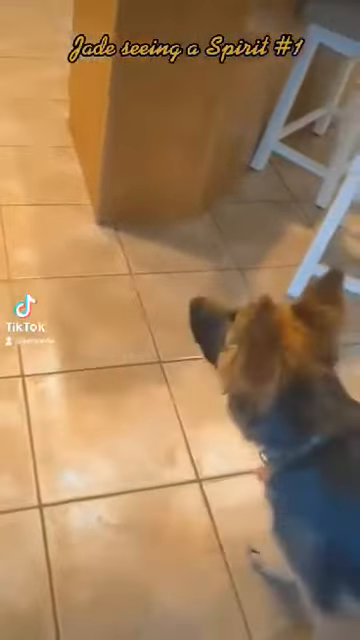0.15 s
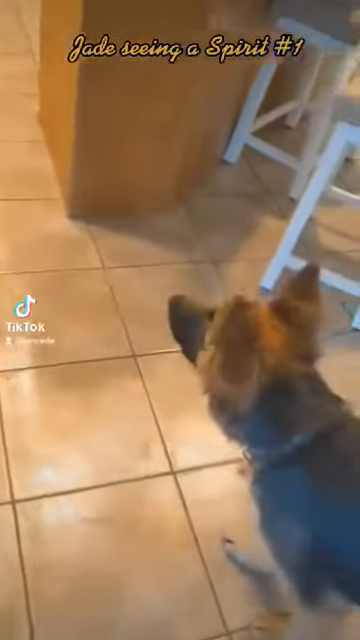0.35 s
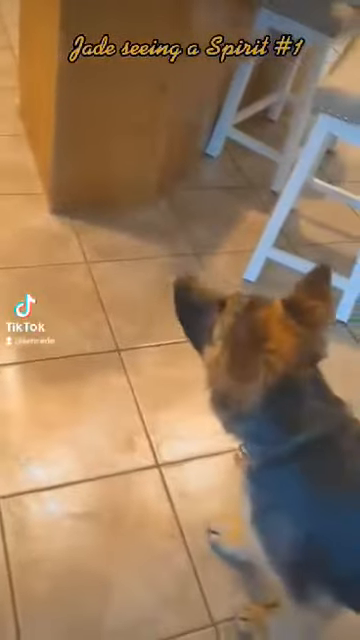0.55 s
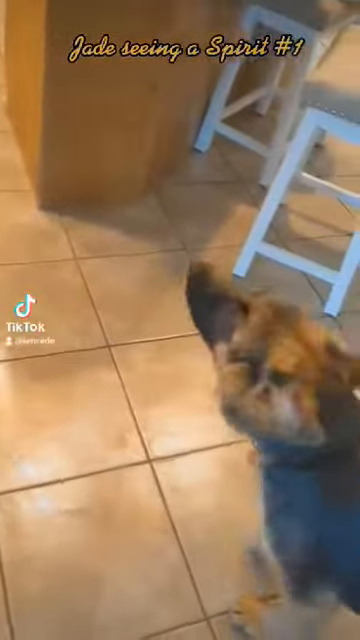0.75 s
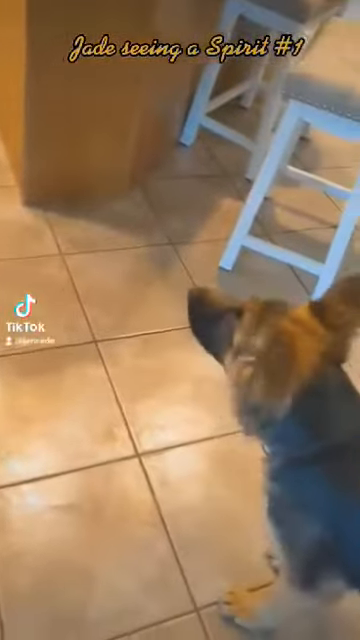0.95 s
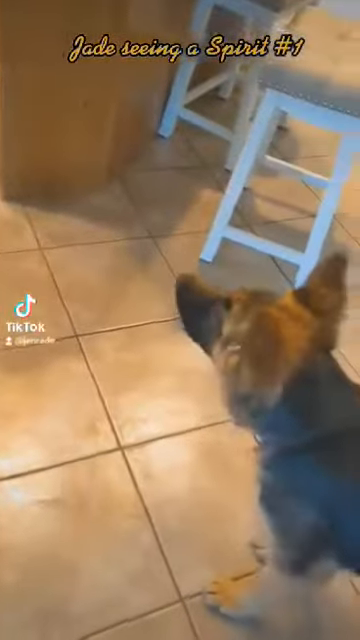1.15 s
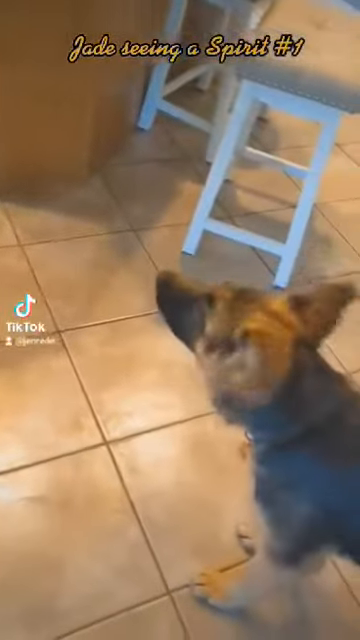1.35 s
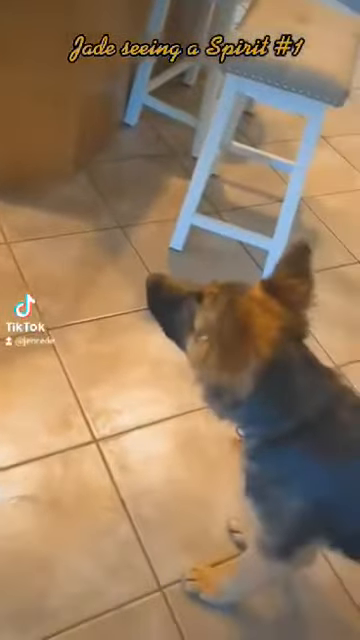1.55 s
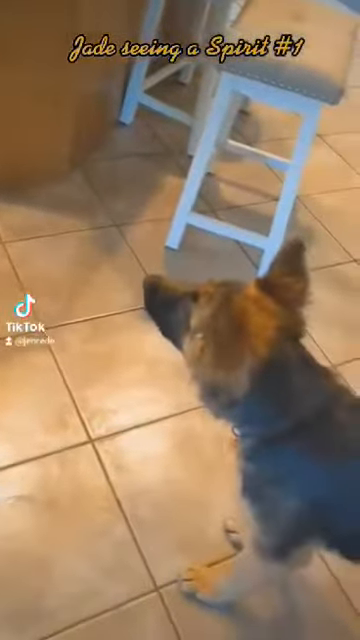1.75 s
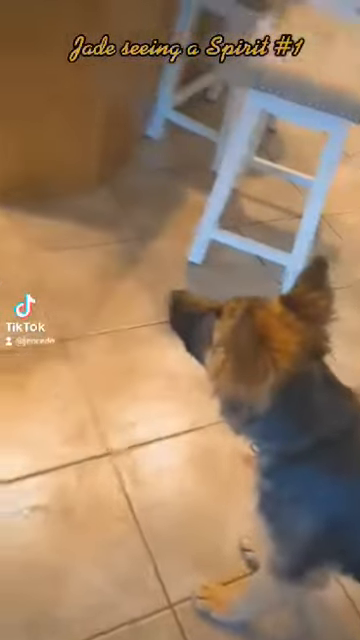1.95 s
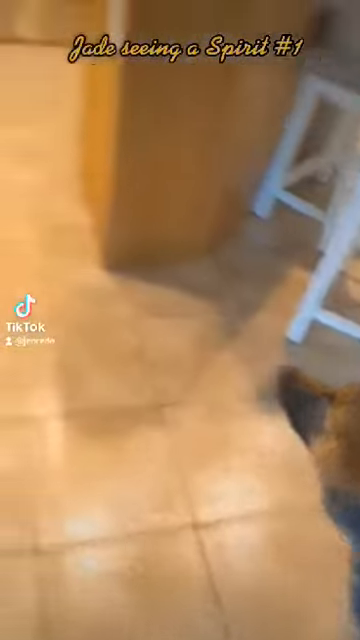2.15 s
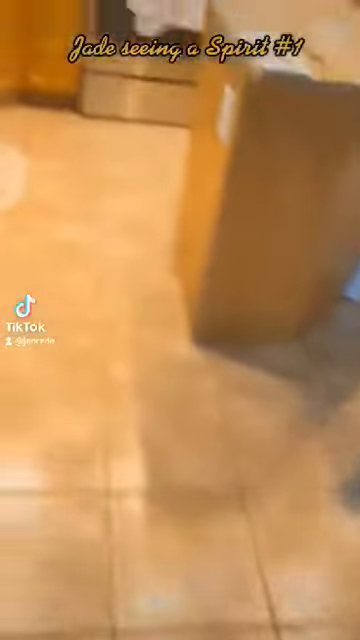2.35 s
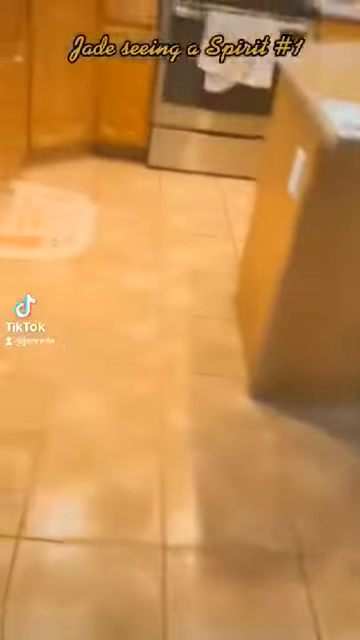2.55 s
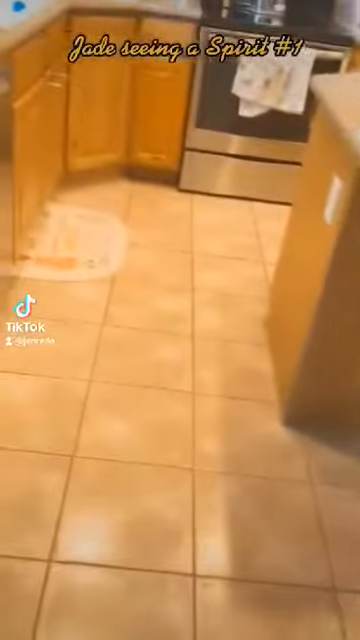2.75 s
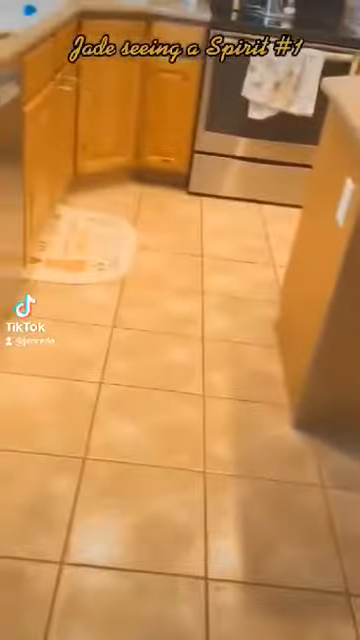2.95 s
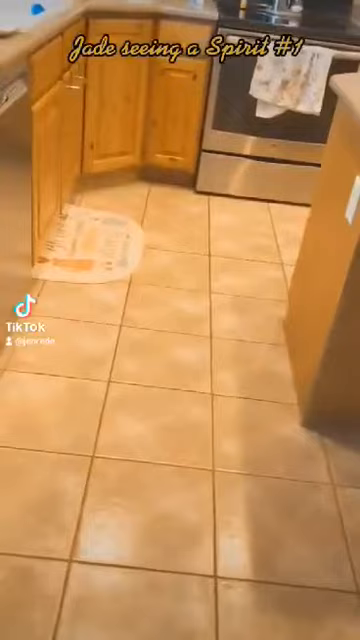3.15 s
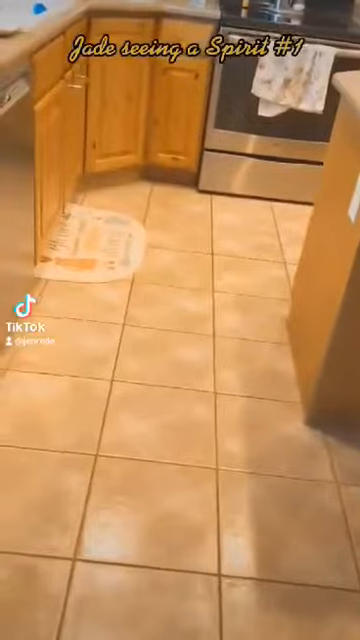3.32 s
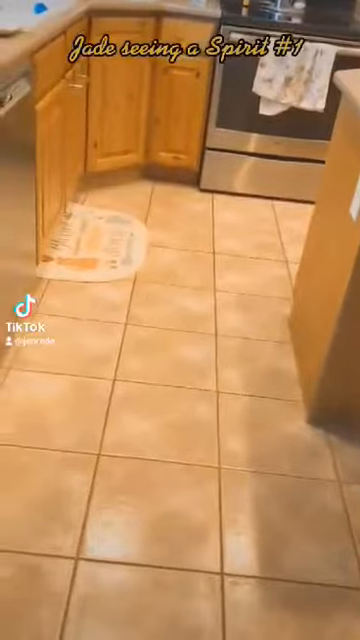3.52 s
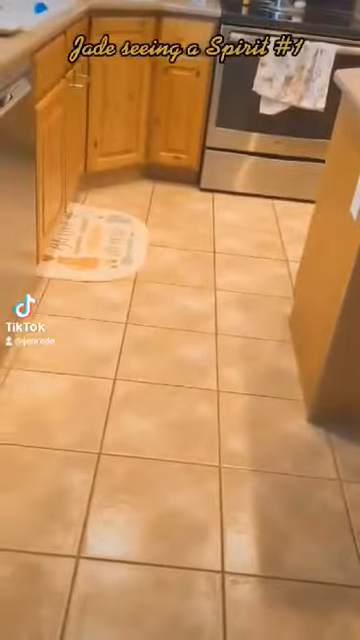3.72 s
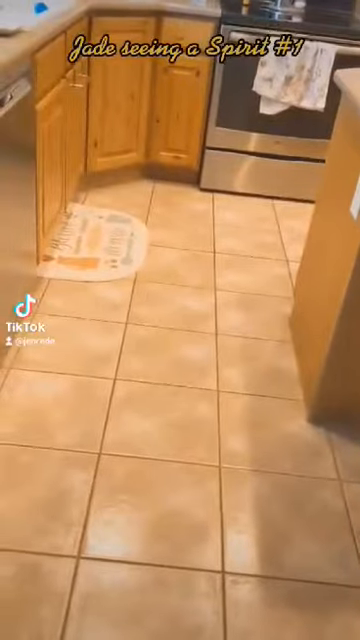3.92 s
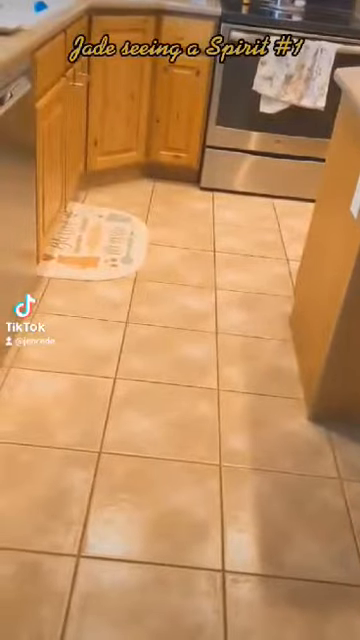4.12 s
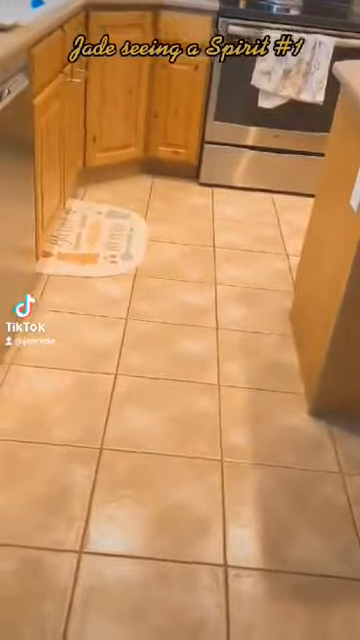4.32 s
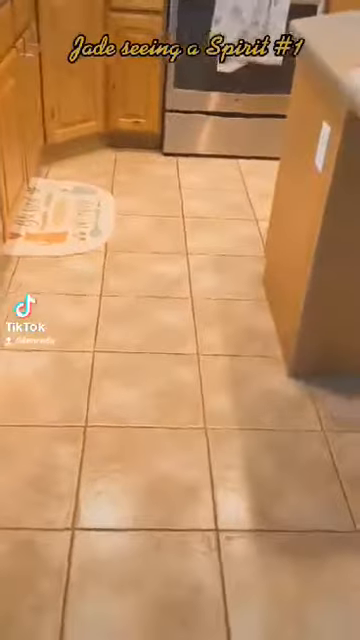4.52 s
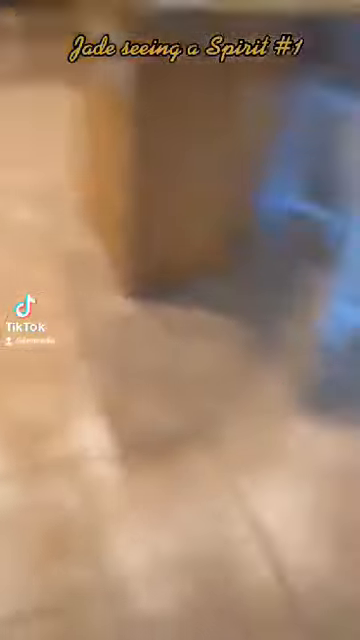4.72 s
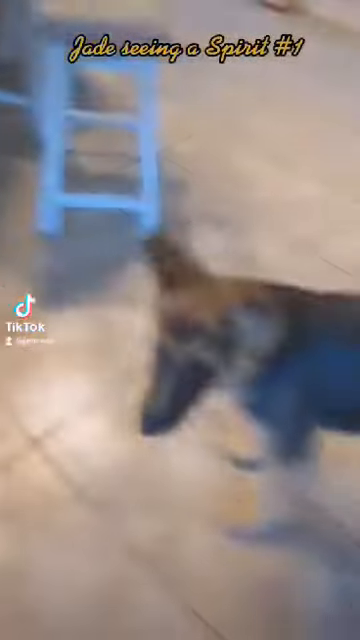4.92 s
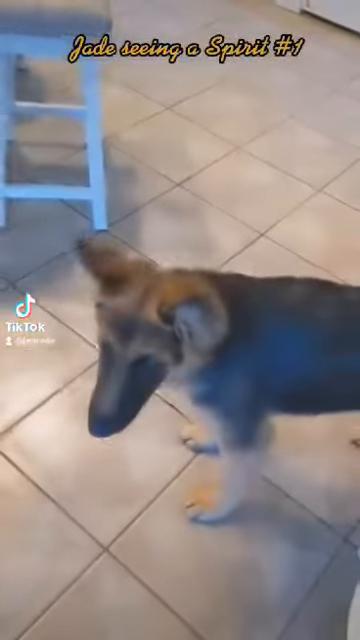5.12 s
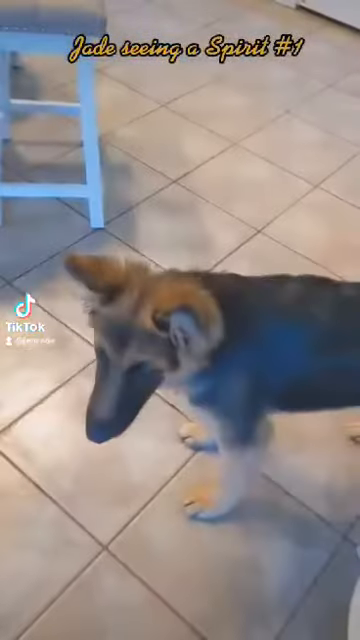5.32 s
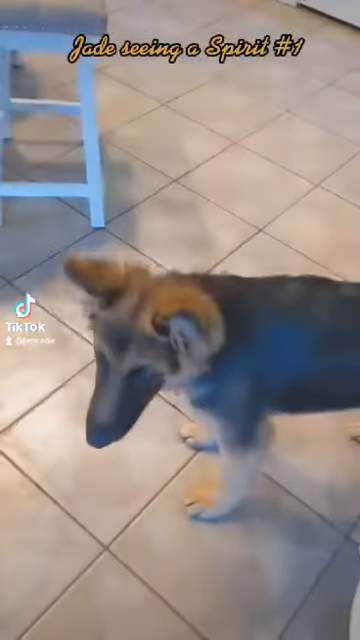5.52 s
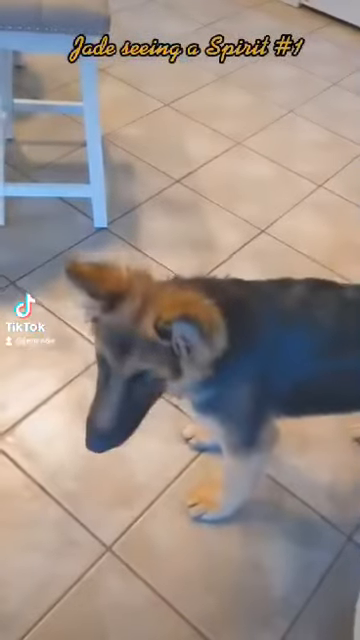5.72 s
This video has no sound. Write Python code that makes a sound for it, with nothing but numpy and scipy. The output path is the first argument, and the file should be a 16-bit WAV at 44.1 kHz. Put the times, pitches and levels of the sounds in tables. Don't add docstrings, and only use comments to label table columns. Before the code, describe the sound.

In a hard-surfaced, tiled kitchen, a young dog barks hoarsely a step or two from a handheld phone. The first bark is already sounding at 0 seconds and dies into a short ringing echo. Faint claw ticks follow at about 0.3 and 0.5, with soft pad thuds near 0.5 and 0.7 and light nose breath. Sharp barks snap upward at 0.8 and 1.3, the second bracketed by low grumbles. After a pause, a brief huff leads to barks at 2.4 and 2.7. A longer, quiet closed-mouth grumble runs from about 2.9 into a strong, short bark at 3.5. Faint claws tick around 3.9 and 4.1. A small huff and grumble precede the last, quieter, raspier bark at 4.6, leaning left. Its echo fades, leaving subdued house hum and low hand rumble, which swells slightly right at the end, near 5.9.

```python
import sys
import numpy as np
from scipy import signal
from scipy.fft import rfft, irfft
from scipy.io import wavfile
from scipy.ndimage import uniform_filter1d, map_coordinates

SR = 44100
rng = np.random.default_rng(int(sys.argv[2]) if len(sys.argv) > 2 else 0)


def put_to_file(sound):
    columns = np.atleast_2d(sound).T
    safe = np.clip(columns, -1, 1)
    whole_steps = np.round(safe * 32767)
    wavfile.write(sys.argv[1], SR, whole_steps.astype(np.int16))


def makeup_ratio(level_db):
    decades = np.asarray(level_db, float) / 20
    return 10 ** decades


N = 258867

# voice breaks open in seconds, top fold rate in Hz, peak effort in dB, rise in seconds,
# hold in seconds.
BARKS = [(-.105, 490.4, -9.5, 0.054, .14), (0.765, 496.9, -6, .062, .08), (1.273, 457.6, -4.5, .05, 0.038),
         (2.41, 497, -10, 0.064, .085), (2.732, 471.2, -5, .06, 0.037), (3.509, 460.2, -3, .05, .012),
         (4.639, 492.4, -12.5, .028, .026)]
# fold rate at the break as a share of the top rate, bend of the rise (exponent),
# effort at the break in dB, effort peak as a share of the rise, effort after the rise in dB.
BARK_MANNERS = [(.62, 1.9, -10.5, 0.44, -5), (0.661, 1.6, -12, .5, -9), (.62, 2.8, -18, .6, -6.5),
                (0.648, 1.3, -10, .6, -5.5), (.66, 3, -11, 0.43, -7), (.66, 4, -17.5, .45, -1.9),
                (0.781, 1.8, -13.5, 0.81, -3.5)]
# frequency at widest gape in Hz, gain at the break in dB,
# gain at mid rise in dB, gain in the hold in dB.
BARK_MOUTHS = [(1000, 4.5, -1, 3), (1140, 8, 4.5, 11.5), (1145, 9, -3.5, 4), (1120, 7, 7, 8.5),
               (1398, 5, -5.5, 5.5), (1000, 7, -13.5, 0.5), (840, 4.5, 7, 14)]
# time in seconds, fold rate in Hz, effort in dB,
# jaw opening 0-1.
GRUMBLES = [
    [(.91, 147, -53, .3), (1.04, 77, -44, .3), (1.12, 83, -48, .4), (1.19, 101, -34.5, .45),
     (1.245, 107.7, -38, 0.6), (1.275, 220, -33, .5)],
    [(1.39, 250, -49.5, .6), (1.44, 149, -24.5, 0.9), (1.49, 125, -39, 0.76), (1.56, 120.6, -45.5, 0.4)],
    [(2.56, 165, -50.5, 0.4), (2.59, 148, -30.5, .3), (2.63, 135.7, -28, .1), (2.69, 121, -40, 0.3),
     (2.73, 215.5, -28, .4)],
    [(2.86, 245.6, -45.5, .3), (2.91, 149, -25, 0.9), (2.95, 119.5, -39.5, .4), (3.004, 105.7, -35.5, .05),
     (3.21, 101.1, -30.5, 0.06), (3.3, 104.5, -35, 0.2), (3.436, 104.5, -31.5, 0),
     (3.48, 101.6, -39.5, .17), (3.51, 230, -29.5, .4)],
    [(4.54, 90, -69, .4), (4.575, 106, -43, .6), (4.605, 168, -37, .6), (4.635, 290, -29.5, .6)],
]
# frequency in Hz, gain in dB.
GRUMBLE_MOUTHS = [(310, 2.5), (800, -3.5), (810, -11.5), (820, 1), (450, 12)]
# frequency in Hz, gain in dB.
THROAT_SHUT = [(60, -15.5), (103, -15), (206, 4), (310, -10.5), (420, -40), (800, -32.5), (1500, -55),
               (3000, -55), (13000, -94.5)]
# frequency in Hz, gain in dB.
THROAT_WIDE = [(100, -19), (250, -1.5), (470, -1), (1000, -7.5), (1900, -11), (2300, -38), (3600, -47.5),
               (4200, -56.5), (6000, -51.5), (8500, -52), (13500, -70)]
# time in seconds, brightness in dB, rasp in dB, sizzle in dB.
VOICE_COLOUR = [(0, -5.5, -15.5, -36.5), (.8, -4.5, -17.5, -39.5), (1.3, -8, -15.5, -37),
                (2.45, -2.5, -11.5, -32.5), (2.77, -7.5, -25, -37.5), (3.2, -4, -31, -39.5),
                (3.54, -8.5, -17, -40.5), (4.67, -0.5, -6, -28)]
# frequency in Hz, density in dB per Hz.
RASP_SPECTRUM = [(200, -29.5), (600, -13), (1000, -4.5), (1900, -6.5), (2400, -22), (3500, -21.5),
                 (4200, -49.5), (14000, -74)]
# frequency in Hz, density in dB per Hz.
SIZZLE_SPECTRUM = [(3000, -43), (4600, -11), (5400, -5), (6500, 2.5), (8300, -5.5), (9300, -16),
                   (12300, -15.5), (13500, -28.5)]
# start in seconds, end in seconds, level in dB, swell as a share of the length 0-1.
HUFFS = [(.667, 0.93, -52.5, 0), (2.27, 2.41, -42, 0.9), (4.6, 4.66, -42, 1), (.537, .59, -52, .05),
         (0.12, 0.53, -64.5, 0.2), (3.19, 3.23, -62.5, 1), (3.92, 3.95, -68, .1)]
# frequency in Hz, density in dB per Hz.
HUFF_SPECTRUM = [(88, -35), (150, -6.5), (836, -10.5), (1490, -13.5), (2290, -9.5), (9290, -15.5),
                 (12100, -21), (13000, -39)]
# time in seconds, peak in dB, ring in Hz.
CLAWS = [(0.284, -40.5, 7240), (0.5392, -37.5, 2100), (1.0587, -45.5, 2000), (1.2176, -54, 2596),
         (3.1936, -44.5, 2180), (3.9245, -50.5, 2340), (4.0741, -58.5, 6180)]
# time in seconds, peak in dB, ring in Hz, t60 in seconds.
PAWS = [(.485, -37, 182.4, 0.2817), (0.674, -45, 262.2, 0.14)]
# time in seconds, left minus right in dB, left lead in ms.
FACING = [(0, 1, .27), (.8, 0.5, .1), (1.3, 0.26, -.09), (2.45, 0.46, .05), (2.77, 0.5, .22),
          (3.2, 0.44, .18), (3.54, 0.5, .16), (4.67, 6, .25)]
# centre in Hz, t60 in seconds, echo level in dB, left-right likeness 0-1.
KITCHEN = [(125, 0.17, -17, .95), (250, 0.37, -10, 1), (527, 0.54, -5, 0), (1000, 0.52, -0.5, 0),
           (2000, 0.56, -7.5, 0.3), (4100, 0.46, -2.5, 0.5), (8360, 0.92, -16.5, 0.3)]
# frequency in Hz, density in dB per Hz.
HOUSE_SPECTRUM = [(15, -35.5), (25, -17.5), (123, -6.5), (203, -11), (400, -14.5), (433, -11), (609, -19.5),
                  (1050, -19), (1730, -25.5), (2310, -29), (13000, -48.5)]
# time in seconds, level in dB.
HOUSE_LEVELS = [(0, -62), (1.9, -66), (5.3, -64.5), (5.55, -73), (5.87, -70)]
# time in seconds, level in dB.
RUMBLE_LEVELS = [(0, -55), (.4, -60.5), (.72, -68), (2.2, -65.5), (2.55, -72), (4.67, -67.5), (5.69, -72),
                 (5.87, -56)]

RUN_UP_S, CLOSE_S = .016, .018
CREEP, DROP = .005, .02
SILENT_DB, SAG_DB_PER_S, CLOSE_DB = -33, 70.5, -37
JAW_START, JAW_WIDE, JAW_END = 0.39, 0.93, .5
MOUTH_START_HZ, MOUTH_REST = 850, 2.02
MOUTH_WIDTH_HZ, BRIGHT_HZ = 190, 1040
JITTER, BREAK, SHIMMER_DB = .006, .035, 1.1848
PRESS_DB, SOFTEN, RASP_DB = 8, 0.97, -5
FIRST_ECHO_S, BUILD_S = 0.002, 0.08
LEAD_IN = int(.2 * SR)
TIME = np.arange(-LEAD_IN, N) / SR


def on_log(table, hz, column):
    rows = np.array(table, float)
    return np.interp(np.log(hz), np.log(rows[:, 0]), rows[:, column])


def at_time(t, table, column):
    columns = np.transpose(table)
    return np.interp(t, columns[0], columns[column])


def coloured(spectrum, size):
    gain = makeup_ratio(on_log(spectrum, np.fft.rfftfreq(size, 1 / SR) + 1, 1))
    x = irfft(rfft(rng.standard_normal(size)) * gain, size)
    return x / x.std()


def walk(rate_hz, size):
    k = int(SR / rate_hz)
    x = uniform_filter1d(uniform_filter1d(rng.standard_normal(size), k), k)
    return x / x.std()


def add(out, s, x):
    i = int(s * SR) + LEAD_IN
    out[i:i + len(x)] += x[:len(out) - i]


def bark(call, manner, mouth):
    opens_s, top_hz, peak_db, rise_s, hold_s = call
    opens_at, bend, break_db, peak_at, after_db = manner
    s = np.linspace(-RUN_UP_S, rise_s + hold_s + CLOSE_S, num=400)
    rising = np.minimum(s / rise_s, 1)
    held = np.clip((s - rise_s) / hold_s, 0, 1)
    closing = np.clip((s - rise_s - hold_s) / CLOSE_S, 0, 1)
    sweep = 1 - (1 - opens_at) * (1 - rising) ** bend
    hz = top_hz * (sweep + CREEP * (held - 1) - DROP * closing)
    stages = [-RUN_UP_S / rise_s, 0, np.clip(peak_at, .1, .9), 1]
    effort_db = peak_db + np.interp(rising, stages, [break_db + SILENT_DB, break_db, 0, after_db])
    effort_db += CLOSE_DB * closing - SAG_DB_PER_S * hold_s * held
    jaw = np.interp(rising, stages[:2], [JAW_START, JAW_WIDE]) - (JAW_WIDE - JAW_END) * closing
    mouth_hz = np.interp(rising, [0, .5, 1], [MOUTH_START_HZ, mouth[0], MOUTH_REST * top_hz])
    mouth_db = np.interp(rising, [0, .5, 1], mouth[1:])
    return np.transpose([opens_s + s, np.maximum(hz, .52 * top_hz), effort_db, jaw, mouth_hz, mouth_db])


def phrase(rows):
    s, *columns = np.transpose(rows)
    t = s[0] + np.arange(int(np.ceil((s[-1] - s[0]) / .3) * .3 * SR)) / SR
    size = len(t)
    hz, effort_db, jaw, mouth_hz, mouth_db = (np.interp(t, s, c) for c in columns)
    jaw = np.clip(jaw, 0, 1)
    rough = 0.04 + jaw
    shaky = JITTER * rough + BREAK * 4 * jaw * (1 - jaw)
    turn = 2 * np.pi * np.cumsum(hz * (1 + shaky * walk(160, size))) / SR
    climb = uniform_filter1d(np.gradient(np.log(hz)) * SR / 15, size=400)
    pressed_db = PRESS_DB * np.clip(climb, 0, 1)
    pressed_db += SOFTEN * np.clip(effort_db + 15.5, -14, 0) * jaw
    bright_db = at_time(t, VOICE_COLOUR, 1) + pressed_db
    voice = 0
    for k in range(1, 29):
        f = k * hz
        throat_db = (1 - jaw) * on_log(THROAT_SHUT, f, 1) + jaw * on_log(THROAT_WIDE, f, 1)
        throat_db += mouth_db / (1 + ((f - mouth_hz) / MOUTH_WIDTH_HZ) ** 2)
        throat_db += bright_db / (1 + (BRIGHT_HZ / f) ** 4)
        depth = min(k - .75, 5) * rough + 1.5 * (k > 4)
        size_waver, phase_waver = depth * walk(230, size), depth * walk(120, size)
        overtone = np.sin(k * turn - 0.31 * k + .3 * phase_waver)
        voice = voice + makeup_ratio(throat_db + SHIMMER_DB * size_waver) * overtone
    rasp_db = RASP_DB + at_time(t, VOICE_COLOUR, 2) + 0.46 * pressed_db
    rasp = coloured(RASP_SPECTRUM, size) * (1 + np.cos(turn)) * jaw ** 2 * makeup_ratio(rasp_db)
    sizzle_db = at_time(t, VOICE_COLOUR, 3) + pressed_db + 0.96 * effort_db + 9
    sizzle = coloured(SIZZLE_SPECTRUM, size) * (1 + .6 * np.cos(turn)) * jaw ** 3 * makeup_ratio(sizzle_db)
    edges = np.clip(np.minimum(t - s[0], s[-1] - t) / .006, 0, 1)
    return (np.sqrt(2) * makeup_ratio(effort_db) * (voice + rasp) + sizzle) * edges


def huff(length_s, db, swell):
    size = int(length_s * SR)
    swelling = np.interp(np.arange(size) / size, [0, swell, 1], [0, 1, .4]) ** 2
    return makeup_ratio(db) * coloured(HUFF_SPECTRUM, size) * makeup_ratio(3.9 * walk(36, size)) * swelling


def claw(db, hz):
    t = np.arange(SR // 2) / SR
    scrape = rng.standard_normal(len(t)) * np.exp(-t / 0.007)
    ring = 1.5 * np.sin(2 * np.pi * hz * t) * np.exp(-t / 0.0026)
    return makeup_ratio(db - 6.0) * np.diff(scrape + ring)


def paw(db, hz, t60_s):
    t = np.arange(SR // 2) / SR
    return makeup_ratio(db) * (1 - np.exp(-t / 0.0027)) * np.sin(2 * np.pi * hz * t) * makeup_ratio(-60 * t / t60_s)


def dog():
    out = np.zeros(len(TIME))
    phrases = [bark(*row) for row in zip(BARKS, BARK_MANNERS, BARK_MOUTHS)]
    for curve, mouth in zip(GRUMBLES, GRUMBLE_MOUTHS):
        phrases.append([(*row, *mouth) for row in curve])
    for rows in phrases:
        add(out, rows[0][0], phrase(rows))
    for start, end, db, swell in HUFFS:
        add(out, start, huff(end - start, db, swell))
    for s, db, hz in CLAWS:
        add(out, s, claw(db, hz))
    for s, db, hz, t60_s in PAWS:
        add(out, s, paw(db, hz, t60_s))
    return out


def kitchen():
    t = np.arange(int(1.2 * SR)) / SR
    octave = np.log2(np.fft.rfftfreq(len(t), 1 / SR) + 1)
    centres = np.log2([row[0] for row in KITCHEN])
    out = 0
    for k, (hz, t60_s, db, alike) in enumerate(KITCHEN):
        share = np.sqrt(np.interp(octave, centres, np.arange(len(KITCHEN)) == k))
        mid, side = irfft(rfft(rng.standard_normal((2, len(t)))) * share, len(t))
        alike = np.clip(alike, 0, 1)
        pair = np.sqrt(1 + alike) * mid + np.sqrt(1 - alike) * side * np.array([[1], [-1]])
        fade = makeup_ratio(-60 * t / t60_s) * (1 - np.exp(-np.maximum(t - FIRST_ECHO_S, 0) / BUILD_S))
        out = out + makeup_ratio(db) * pair * fade / np.sqrt(2 * np.sum(fade ** 2))
    return out


def house():
    size = len(TIME)
    mid, side = coloured(HOUSE_SPECTRUM, size), coloured(HOUSE_SPECTRUM, size)
    side = signal.sosfilt(signal.butter(1, 300, "high", fs=SR, output="sos"), side)
    level = makeup_ratio(at_time(TIME, HOUSE_LEVELS, 1) + walk(8, size))
    return level * (mid + 0.52 * side * np.array([[1], [-1]]))


def handling():
    size = len(TIME)
    rumble = coloured([(20, -23.0), (38, -17.0), (58, 11.5), (85, -2.0), (130, -47.0)], size)
    rumble *= makeup_ratio(at_time(TIME, RUMBLE_LEVELS, 1) + 3 * walk(6, size))
    return rumble * makeup_ratio([[.8], [-.8]]) 


def scene():
    source = dog()
    pan_db = at_time(TIME, FACING, 1)
    half_lead = at_time(TIME, FACING, 2) * SR / 2000
    place = np.arange(len(TIME))
    straight = np.array([map_coordinates(source, [place + side * half_lead], order=3) * makeup_ratio(side * pan_db / 2)
                         for side in (1, -1)])
    echoes = signal.fftconvolve(source[None], kitchen(), axes=1)[:, :len(TIME)]
    return (straight + echoes + house() + handling())[:, LEAD_IN:]


def top_cut(x):
    return signal.sosfilt(signal.butter(12, 13440, fs=SR, output="sos"), x)


def record(dry):
    x = np.tanh(1.1 * (dry - .003 * dry ** 2)) * .95
    x = signal.sosfilt(signal.butter(1, 20, "high", fs=SR, output="sos"), x)
    x = signal.sosfilt(signal.ellip(8, .2, 60, 13300, fs=SR, output="sos"), x)
    return top_cut(x)


dry = scene()
out = record(dry)
put_to_file(out)
```